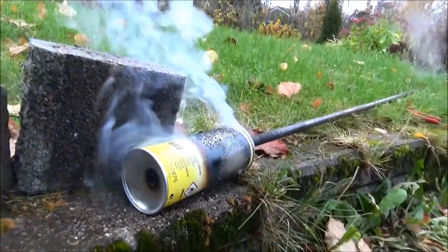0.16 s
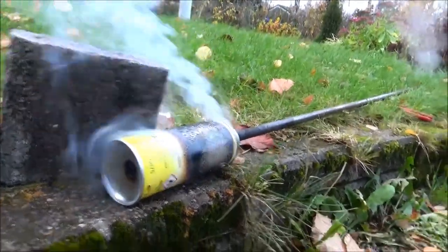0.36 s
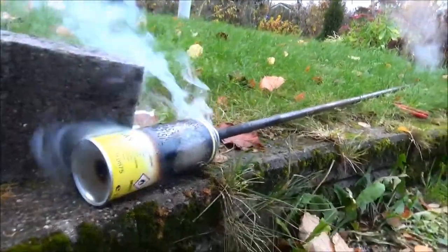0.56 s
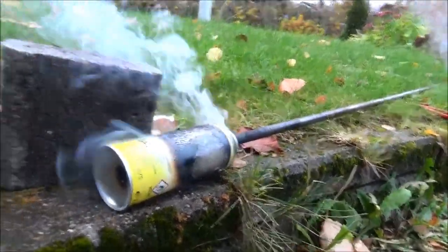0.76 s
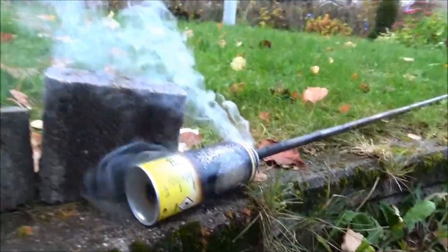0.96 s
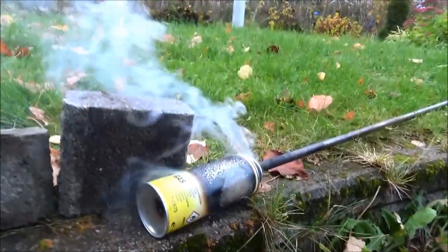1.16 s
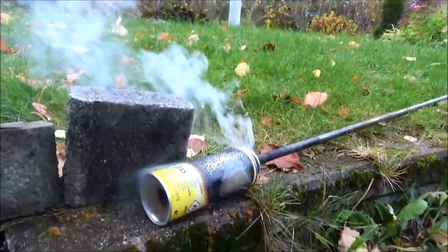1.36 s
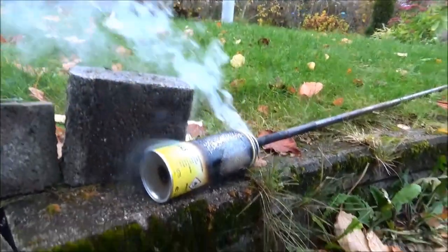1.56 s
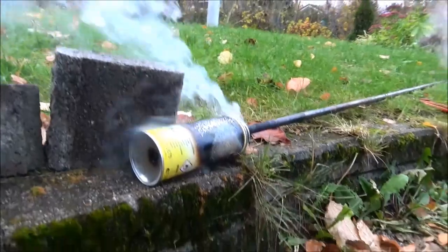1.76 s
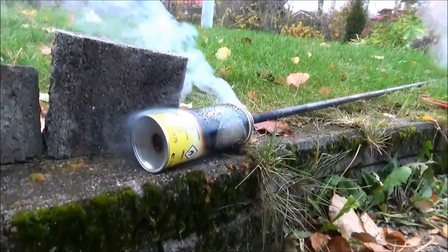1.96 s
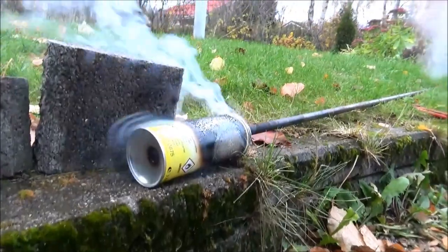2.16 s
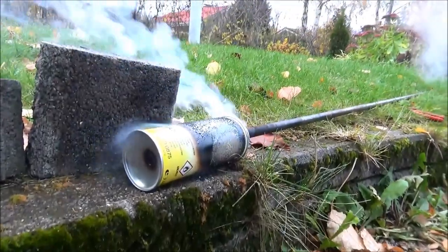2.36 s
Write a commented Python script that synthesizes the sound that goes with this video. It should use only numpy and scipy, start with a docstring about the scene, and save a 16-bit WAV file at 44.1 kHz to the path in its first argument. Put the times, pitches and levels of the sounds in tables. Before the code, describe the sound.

A small homemade pulse jet sputters close by from the start to the end at about 2.5 seconds. Its very rapid pops blend into a low, rough buzz, with spits of hissing gas, rasping flame and a slight tinny ring. It catches, weakens and stumbles several times a second, never settling or stopping for long. A faint garden echo and a soft, low rumble of air lie underneath.

```python
"""Over a low rumble of garden air, a pulse jet made from a spray can sputters on a stone ledge close by.
Each firing starts with a sharp pressure pop that rings the can a little. Hissing gas and a rasp of flame
spit out just after it, a round surge follows half a cycle later, and the garden returns a faint echo.
The jet fires about a hundred times a second, in short runs that catch, weaken and stumble to the end."""
import sys
import numpy as np
from scipy import signal
from scipy.fft import rfft, irfft, next_fast_len
from scipy.io import wavfile
from scipy.ndimage import uniform_filter1d

SR = 44100
rng = np.random.default_rng(int(sys.argv[2]) if len(sys.argv) > 2 else 0)


def dump(signal):
    """Clip the signal to [-1, 1] and save it as 16-bit WAV at the path in sys.argv[1]."""
    limited = np.clip(np.atleast_2d(signal).T, -1, 1)
    pcm = np.round(limited * 32767).astype(np.int16)
    wavfile.write(sys.argv[1], SR, pcm)


N = 110250  # 2.5 seconds


def amp(db):
    """Turns decibels into a number to multiply by."""
    return 10 ** (np.asarray(db) / 20)


def value_at(points, hz):
    """Looks up a value between the rows of a table, on a musical (logarithmic) pitch scale."""
    pitches, values = np.transpose(points)
    return np.interp(np.log(hz + 1), np.log(pitches + 1), values)


def colour(x, tone):
    """Makes each pitch louder or softer, following rows of pitch_hz, level_db."""
    size = next_fast_len(N + 8192)
    gain = amp(value_at(tone, np.fft.rfftfreq(size, 1 / SR)))
    return irfft(rfft(x, size) * gain, size)[..., :N]


def noise(tone, spread):
    """Stereo noise of about unit level; spread is the share that differs between the ears."""
    mid, side = colour(rng.standard_normal((2, N)), tone)
    return np.array([mid + spread * side, mid - spread * side]) / mid.std()


def add(mix, start_s, sound):
    """Mixes a sound in at a given time."""
    at = round(start_s * SR)
    sound = sound[max(-at, 0):]
    part = mix[max(at, 0):][:len(sound)]
    part += sound[:len(part)]


def bump(t, width_s):
    """A smooth rise and fall around time zero."""
    return np.exp(-.5 * (t / width_s) ** 2)


def with_ringing(x, notes):
    """A sound plus the fading notes it sets off; each note drops 60 dB in ring_s."""
    t = np.arange(SR // 5) / SR
    ring = sum(amp(db - 60 * t / ring_s) * np.cos(2 * np.pi * hz * t) for hz, db, ring_s in notes)
    return x + .5 * signal.fftconvolve(x, ring)[:N]


# Tone of the garden air: pitch_hz, level_db
RUMBLE_TONE = [(15, -8), (40, -3.5), (80, -9), (200, -2), (1000, -34), (16000, -61)]

def air_rumble():
    """The air rumbles, low and steady."""
    return amp(-43) * noise(RUMBLE_TONE, spread=0.18)


# Runs of firings. Each starts build_db below its strength and ends fade_db below it:
# first_s, last_s, count, strength_db, build_db, fade_db
RUNS = [ (.002, 0.013, 2, -16.5, 6, -0.5), (0.028, 0.027, 2, -6, 1, 19), (0.046, .061, 3, -5, -5.5, 11),
        (0.068, 0.125, 7, 0.5, 10.5, 8.5), (.145, 0.165, 3, -12, -7.5, 11), (0.178, .218, 5, -2.5, -1, 9.5),
        (.226, 0.281, 6, 3, 20.5, 8.5), (0.287, 0.323, 5, 6, 21, 26), (0.335, .413, 9, 1.5, 4, 10),
        (0.45, 0.548, 11, -0.5, 0, 12.5), (0.561, .616, 7, -0.5, 1.5, 11), (0.637, 0.748, 12, -1, 3, 10),
        (.768, 0.811, 5, 2.5, 5, 5), (0.824, 0.85, 4, -8.5, -5.5, 9.5), (.861, 0.871, 2, -16, -2.5, -1),
        (.885, 0.93, 6, -1.5, -0.5, 15.5), (.944, .984, 5, 1, 8.5, 11.5), (.993, 1.052, 7, -2, 3, 7),
        (1.062, 1.079, 3, -1.5, 1, 19), (1.102, 1.127, 3, -9.5, 2, 4), (1.138, 1.17, 4, 2, 0.5, 6),
        (1.186, 1.206, 3, 3, 3, 3), (1.222, 1.242, 3, -2, -3.5, 14), (1.249, 1.302, 6, 4.5, 9, 19.5),
        (1.319, 1.397, 9, 3, 10.5, 14), (1.402, 1.469, 8, 1.5, -1, 12), (1.493, 1.544, 6, 2.5, -0.5, 12),
        (1.551, 1.59, 5, -2.5, 4.5, 10.5), (1.603, 1.661, 7, 3, 2, 19.5), (1.677, 1.717, 5, -2.5, -2.5, 1),
        (1.728, 1.772, 6, 0, -2, 13.5), (1.784, 1.792, 2, -20, -8, -5), (1.803, 1.825, 3, 3, 0, 0.5),
        (1.839, 1.86, 3, -6.5, -1.5, 18), (1.881, 1.894, 2, -11, -0.5, 4), (1.909, 1.931, 3, 4.5, 4, 5.5),
        (1.945, 1.988, 6, -3.5, -2.5, 5), (1.997, 2.047, 6, -5.5, -2.5, -5),
        (2.066, 2.117, 7, 0.5, 0.5, 20.5), (2.126, 2.153, 4, -8, -5, -5.5),
        (2.164, 2.216, 6, -3, 0.5, -3.5), (2.227, 2.284, 7, 0, -1, 7), (2.306, 2.345, 5, 1.5, 3, 14.5),
        (2.352, 2.394, 5, 0, 4.5, -1.5), (2.408, 2.424, 3, -17, -7.5, 11), (2.450, 2.493, 5, 1.5, 0.5, 1)]
STRETCH_PER_DB = .013  # a stronger firing needs longer to refill the can

def firings(jitter_s=.0001, scatter_db=1.63):
    """Lists each firing's time_s, strength_db. Most runs catch, then fade and hurry as they weaken."""
    rows = []
    for first_s, last_s, count, db, build_db, fade_db in RUNS:
        progress = np.linspace(0, 1, round(count))
        strength = db - build_db * (1 - progress) ** 4.04 - fade_db * progress ** 2.527
        gaps = np.exp(STRETCH_PER_DB * strength[1:])
        times = first_s + (last_s - first_s) * np.append(0, np.cumsum(gaps)) / gaps.sum()
        rows += zip(times, strength)
    return np.array(rows) + rng.standard_normal((len(rows), 2)) * [jitter_s, scatter_db]


# Slow drift in the size of the pressure swing: time_s, level_db
SWING_LEVEL = [(0, 0.5), (.25, -1), (.55, 0), (.75, -.5), (1.0, 0), (1.15, 0), (1.4, -0.5), (1.68, 1),
               (1.88, -1), (1.95, 1), (2.1, 1.5), (2.25, 1), (2.33, -1), (2.5, -3)]
# Notes of the can's air and pipe: pitch_hz, level_db, ring_s
CAN_NOTES = [(201, -43, 0.032), (321, -40.5, 0.033), (405, -39, 0.031), (653, -44.5, 0.047)]
# Tone of the pressure wave: pitch_hz, level_db
PRESSURE_TONE = [(20, -41), (50, -23), (72, -8), (100, 0), (150, -0.5), (200, -2), (300, 1), (450, -2.5),
                 (700, 2.5), (1000, 4.5), (1250, -6.5), (1600, -8), (3000, -20)]

def pops_and_surges(fired, memory=0.49, stall_s=0.023, cold_db=-17, weak_db=-10, uneven=0.13):
    """Each firing pops, then surges; the pops ring the can and the surges swing the air inside it."""
    t = np.arange(-SR // 100, SR // 50) / SR
    times, strength = fired.T
    # The swing partly follows the firing before; after a stall it starts cold.
    stalled = np.diff(times, prepend=-1) > stall_s
    previous_db = np.where(stalled, cold_db, np.roll(strength, 1))
    drive_db = (1 - memory) * strength + memory * previous_db
    pops, surges = np.zeros((2, N))
    for time_s, db in zip(times, drive_db):
        late, pop_width, surge_width, pop_size = rng.standard_normal(4)  # chance variations
        collapse_db = 0.89 * min(db - weak_db, 0)  # a weak firing barely swings
        swing = amp(np.interp(time_s, *np.transpose(SWING_LEVEL)) + collapse_db)
        pop = np.exp(uneven * pop_size) * bump(t, width_s=0.0003 * np.exp(uneven * pop_width))
        add(pops, time_s + t[0], swing * amp(-13.5 + 0.12 * db) * pop)
        delay_s = 0.00495 * np.exp(STRETCH_PER_DB * db / 2) + 0.00044 * late
        surge = bump(t - delay_s, width_s=0.00095 * np.exp(uneven * surge_width))
        add(surges, time_s + t[0], swing * amp(-12 + 0.18 * db) * surge)
    boom = (116.6, -46, 0.04)  # the air in the can: pitch_hz, level_db, ring_s
    return colour(with_ringing(pops, CAN_NOTES) + with_ringing(surges, [boom]), PRESSURE_TONE)


def spits(fired, delay_s, width_s, tail_s, tail_db, follow, wander_s, uneven):
    """Loudness of the gas each firing spits: a burst and a weak tail, up follow dB per dB of strength."""
    t = np.arange(-SR // 100, SR // 20) / SR
    power = np.zeros(N)
    for time_s, db in fired:
        wide, late = rng.standard_normal(2)
        burst_s = width_s * np.exp(uneven * wide)
        tail = np.where(t > 0, np.exp(-abs(t) / tail_s), bump(t, 2 * burst_s))
        spit = bump(t, burst_s) ** 2 + (amp(tail_db) * tail) ** 2
        add(power, time_s + t[0] + delay_s + wander_s * late, amp(follow * db) ** 2 * spit)
    return np.sqrt(power)


def turbulence(x, patchy_db=2.0):
    """Swirling gas changes the tone of the hiss from moment to moment."""
    spectrum = signal.stft(x, nperseg=256)[2]
    patches = rng.standard_normal(spectrum.shape[1:])
    for axis in (0, 1):  # smooth across pitch, then across time
        patches = uniform_filter1d(patches, size=5, axis=axis)
    return signal.istft(spectrum * amp(patchy_db * patches / patches.std()), nperseg=256)[1][:, :N]


# Tone of the escaping gas: pitch_hz, level_db
HISS_TONE = [(800, -27), (1500, -28.5), (2500, -3), (4200, -6.5), (6000, -2.5), (7200, -2.5), (9000, 1.5),
             (13000, -3.5), (15200, -6.5), (16200, -16.5)]

def gas_hiss(fired):
    """Gas shoots out just after each pop with a fine hiss."""
    hiss = turbulence(noise(HISS_TONE, spread=0.1))
    loudness = spits(fired, delay_s=0.0013, width_s=0.00097, tail_s=0.0035, tail_db=-8,
                     follow=1.0, wander_s=0.00022, uneven=0.2)
    return amp(-27.5) * hiss * loudness


# Tone of the flame: pitch_hz, level_db
RASP_TONE = [(200, -3), (500, 9), (950, 4.5), (1250, 0), (1500, -7), (1800, 2), (2200, -1.5), (2600, 1),
             (4000, -10), (8000, -31), (16000, -45)]
# Notes of the can's tin wall: pitch_hz, level_db, ring_s
TIN_NOTES = [(2460, -45.5, 0.055), (2880, -51, 0.026)]

def flame_rasp(fired):
    """Each spit of flame makes a coarser, longer rasp that rings the tin wall."""
    rasp = amp(-31) * noise(RASP_TONE, spread=0.016)
    loudness = spits(fired, delay_s=0.0014, width_s=0.0015, tail_s=0.013, tail_db=-13,
                     follow=0.71, wander_s=0.0001, uneven=0.18)
    return np.array([with_ringing(side, TIN_NOTES) for side in rasp * loudness])


# Time the echo takes to drop 60 dB: pitch_hz, fade_s
ECHO_FADE = [(100, 2.6), (400, 0.17), (2000, 0.15), (12000, 0.3)]
# Tone of the echo: pitch_hz, level_db
ECHO_TONE = [(80, -26), (200, -5.5), (400, -4.5), (900, -9), (2000, -12), (5000, -16.5), (14000, -28)]

def garden_echo(jet, spread=0.071, echoes_per_s=2000, first_echo_s=.006):
    """Stones and hedges scatter the sound back, nearly alike in both ears."""
    size = SR // 2
    echoes = rng.standard_normal((2, size)) * (rng.random((2, size)) < echoes_per_s / SR)
    mid, side = echoes * (np.arange(size) > first_echo_s * SR)
    hz, t, spectrum = signal.stft([mid + spread * side, mid - spread * side], SR, nperseg=256)
    fade_s = value_at(ECHO_FADE, hz)[:, None]
    tail = signal.istft(spectrum * amp(-60 * t / fade_s) / np.sqrt(fade_s), SR, nperseg=256)[1]
    tail /= np.linalg.norm(tail[0])
    return colour(signal.fftconvolve(jet, tail, axes=1)[:, :N], ECHO_TONE)


# How much louder the left side is than the right: pitch_hz, level_db
LEFT_LEAN = [(30, 4), (90, 2.5), (180, 3), (350, 2), (600, 2.1), (900, 1.64), (2000, -2.4), (9000, 0.9)]

def scene():
    """Mixes the jet, its echo and the air; the bass leans to the left."""
    fired = firings()
    jet = gas_hiss(fired) + flame_rasp(fired) + pops_and_surges(fired)
    left, right = jet + garden_echo(jet) + air_rumble()
    left = colour(left, [(hz, db / 2) for hz, db in LEFT_LEAN])
    right = colour(right, [(hz, -db / 2) for hz, db in LEFT_LEAN])
    return np.array([left, right])


def record(dry, top_hz=16200):
    """Cuts away the very highest treble."""
    low_pass = signal.firwin(511, top_hz, window=("kaiser", 9), fs=SR)
    return signal.oaconvolve(dry, low_pass[None], "same")


dry = scene()
out = record(dry)
dump(out)
```